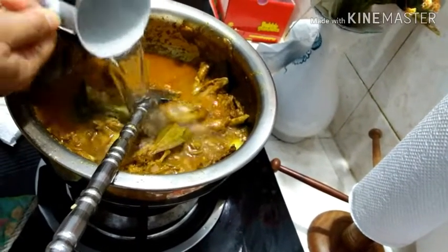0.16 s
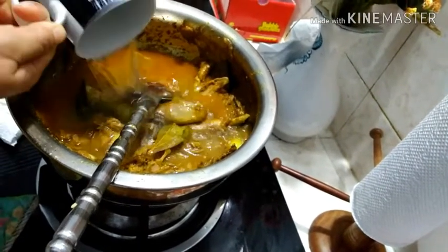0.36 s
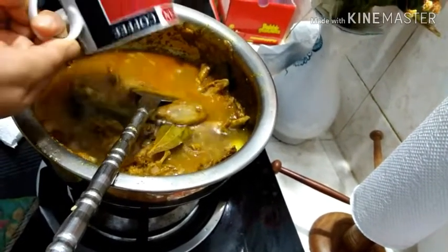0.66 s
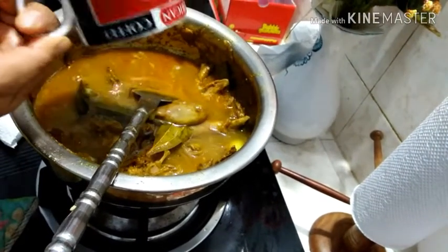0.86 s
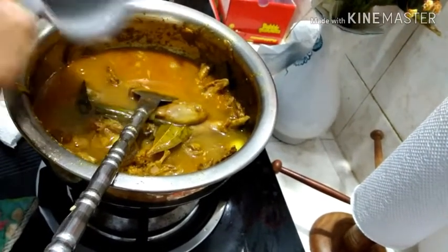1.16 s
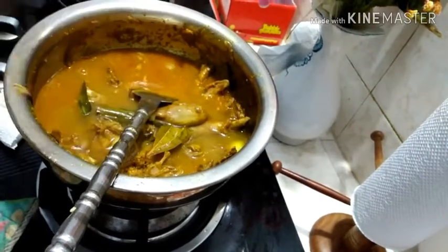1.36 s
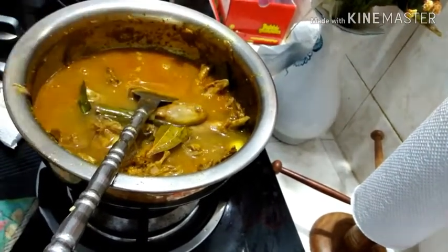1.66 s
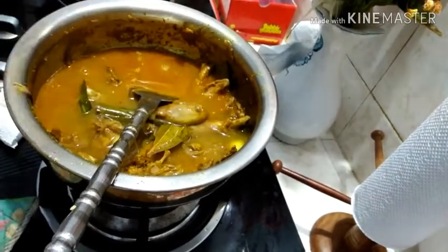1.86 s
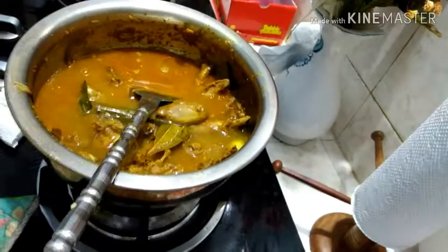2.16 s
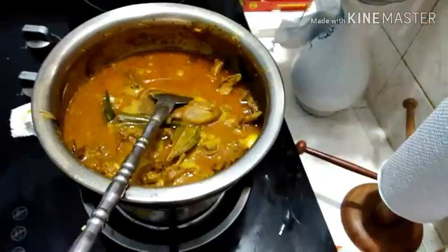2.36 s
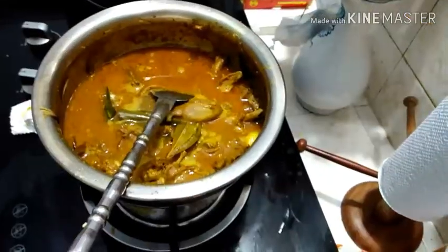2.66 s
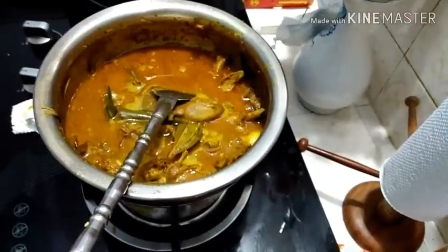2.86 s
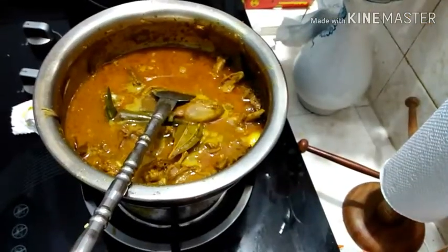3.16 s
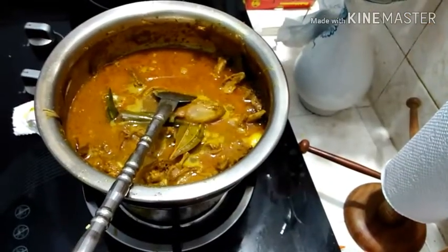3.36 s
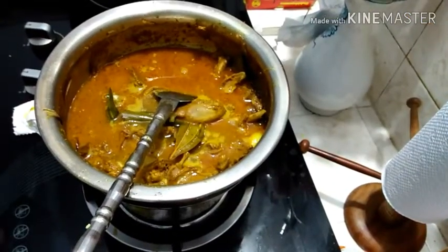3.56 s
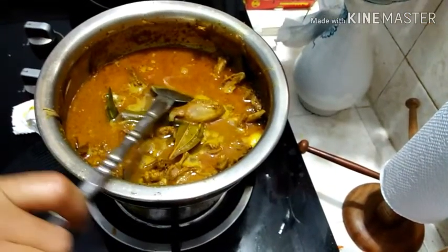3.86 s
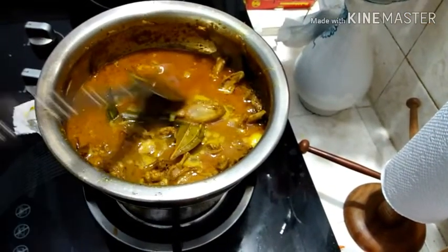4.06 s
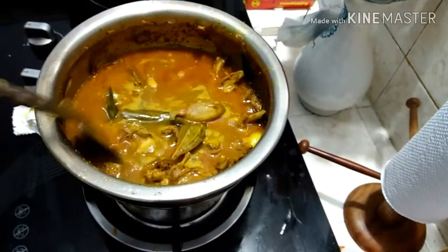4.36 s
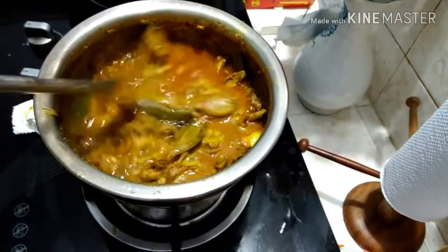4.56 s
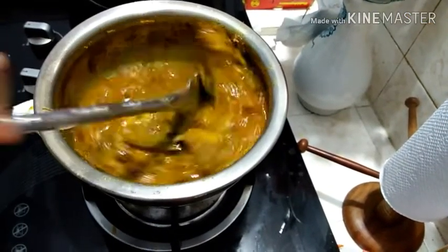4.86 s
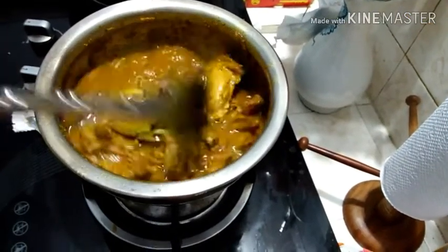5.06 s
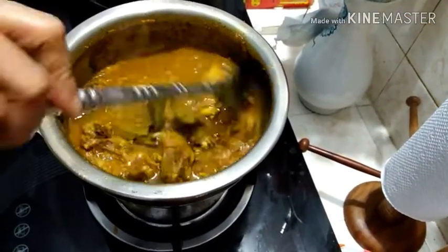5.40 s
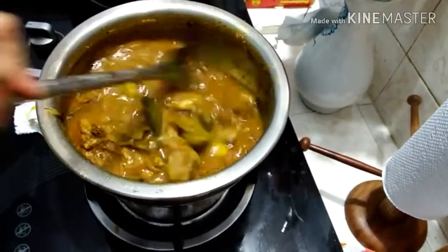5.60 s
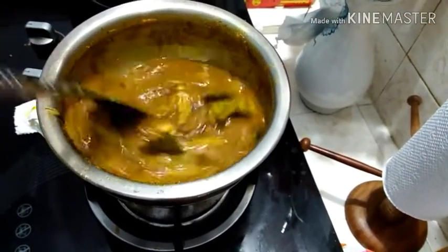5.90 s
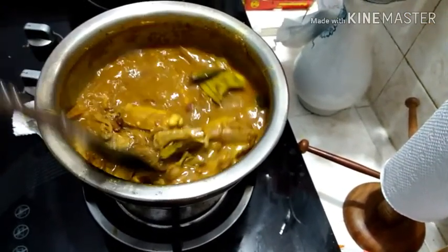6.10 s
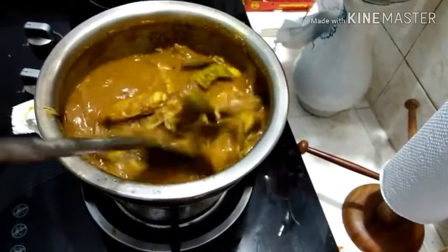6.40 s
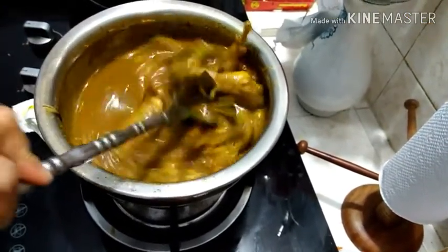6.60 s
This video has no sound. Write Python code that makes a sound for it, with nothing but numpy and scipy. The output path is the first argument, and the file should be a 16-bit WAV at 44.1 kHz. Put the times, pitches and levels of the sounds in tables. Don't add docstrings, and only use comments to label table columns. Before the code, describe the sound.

Water trickles into a hissing, spitting pot of stew, then a metal spatula stirs, clacking sharply and clanking against the ringing rim.

```python
import sys
import numpy as np
from scipy import signal
from scipy.io import wavfile
from scipy.ndimage import uniform_filter1d

SR = 44100
rng = np.random.default_rng(int(sys.argv[2]) if len(sys.argv) > 2 else 0)


def transcribe(signal):
    frames = np.atleast_2d(signal).T
    limited = np.clip(frames, -1, 1)
    pcm = np.round(limited * 32767).astype(np.int16)
    wavfile.write(sys.argv[1], SR, pcm)


def boost_factor(decibels):
    exponent = np.asarray(decibels, float) / 20
    return 10 ** exponent


N = 297234
T = np.arange(N) / SR
MOVE_S = 2.1
BRIGHT_HZ = 2800
DROP_RISE_S = 0.0018


def evened(x):
    return x / np.sqrt(np.mean(x ** 2) + 1e-20)


def read(points, hz):
    f, value = np.transpose(points)
    return np.interp(np.log(hz + 1), np.log(f + 1), value)


def curves(rows):
    s, *columns = np.transpose(rows)
    return [np.interp(T, s, column) for column in columns]


def add(mix, s, sound):
    part = mix[..., max(round(s * SR), 0):][..., :sound.shape[-1]]
    part += sound[..., :part.shape[-1]]


def bump(middle_s, width_s):
    return np.exp(-((T - middle_s) / width_s) ** 2)


def noise(shape, patchy_db, low_hz=1, high_hz=SR, size=512):
    frames, hz = 4 * N // size + 5, np.fft.rfftfreq(size, 1 / SR)
    a, b, patches = rng.standard_normal((frames, len(hz), 3)).T
    patches = uniform_filter1d(patches, size=7, axis=0)
    patches = evened(uniform_filter1d(patches, size=16, axis=1))
    band = 1 / np.sqrt((1 + (low_hz / (hz + 1)) ** 20) * (1 + (hz / high_hz) ** 20))
    colour = boost_factor(read(shape, hz)[:, None] + patchy_db * patches) * band[:, None]
    sound = signal.istft((a + 1j * b) * colour, nperseg=size, noverlap=3 * size // 4)[1]
    return evened(sound[:N])


def resonate(x, hz, width):
    turn, r = np.exp(2j * np.pi * hz * T), np.exp(-np.pi * width / SR)
    smooth = signal.lfilter([1], np.convolve([1, -r], [1, -r]), x / turn)
    return (turn * smooth).real


def struck(t, rise, t60):
    return (1 - np.exp(-t / np.maximum(rise, .0002))) * boost_factor(-60 * t / np.maximum(t60, .005))


def bursts(rows):
    out, t = np.zeros(N), T[:SR // 3]
    for s, db, low_hz, high_hz, rise, t60 in rows:
        sos = signal.butter(3, [low_hz, high_hz], "band", fs=SR, output="sos")
        band = signal.sosfilt(sos, rng.standard_normal(len(t)))
        add(out, s, boost_factor(db) * struck(t, rise, t60) * evened(band))
    return out


def pings(rows):
    bubble_t60_s, bubble_glide = 0.02, 0.12
    out, t = np.zeros(N), T[:SR // 4]
    for s, db, hz, rise, t60 in rows:
        u = t[:round(2 * t60 * SR) + SR // 100]
        is_bubble = (t60 < bubble_t60_s) * (hz < BRIGHT_HZ + 500)
        glide = bubble_glide * is_bubble * u / t60
        add(out, s, boost_factor(db) * struck(u, rise, t60) * np.sin(2 * np.pi * hz * u * (1 + glide)))
    return out


# (f/Hz, width/Hz, throb depth 0-1)
MOTOR_TONES = [(135.5, 4, 0.85), (68.6, 11, 0)]


def drones(motor_db, low_db):
    throb_s, peak_s, skew = 0.158, 1.835, 0.6
    turn = 2 * np.pi * (T - peak_s) / throb_s
    beat = np.cos(turn + skew * (np.cos(turn) - 1))
    out = np.zeros(N)
    for (hz, width, depth), db in zip(MOTOR_TONES, (motor_db, low_db)):
        tone = evened(resonate(rng.standard_normal(N), hz, width))
        sway = np.sqrt(uniform_filter1d(tone ** 2, size=1500) + 1e-9)
        steady = tone / sway ** .85
        out += boost_factor(db - 1.0) * evened(steady * (1 + depth * beat))
    return out


# (f/Hz, level/dB per Hz)
MURMUR_COLOUR = [(15, -54), (25, -25), (60, -6), (97, -3), (134, -2), (223, -31.5), (275, -11.5),
                 (363, -31.5), (404, -20.5), (532, -18.5), (617, -17), (1300, -20), (2450, -22),
                 (2850, -30.5), (3380, -40), (4000, -39.5), (5200, -32.5), (8800, -120)]
# (t/s, level/dB)
MOTOR_SWELL = [(0.0, -67), (0.36, -65), (0.71, -62), (0.98, -57), (1.73, -52), (2.36, -51), (2.55, -62),
               (2.74, -65.5), (3.1, -63), (4.07, -61), (4.49, -57.5), (4.9, -62), (5.05, -64.5),
               (5.33, -64), (5.74, -65), (6.14, -66), (6.74, -68.5)]
# (level/dB, share)
MOTOR_FOLLOWERS = [(-55, 0.18), (-64.5, 0.43), (-65.5, 0.74)]


def room_noise():
    motor_db, = curves(MOTOR_SWELL)
    murmur_db, boom_db, low_db = [db + share * (motor_db + 62.0) for db, share in MOTOR_FOLLOWERS]
    lull_db = -3.5 * bump(2.72, 0.18)
    murmur_db = murmur_db + 5 * bump(0.19, 0.12) + lull_db
    boom_db = boom_db + 7 * bump(4.82, 0.48) + lull_db
    low_db = low_db - 11 * (T < MOVE_S)
    out = boost_factor(murmur_db - 4.0) * noise(MURMUR_COLOUR, 2.6, 604, 4800, size=1024)
    out += boost_factor(boom_db - 1.84) * noise(MURMUR_COLOUR, 2.5, 157, 480, size=2048)
    out += boost_factor(-66.0) * noise(MURMUR_COLOUR, 0.31, 1, 200, size=2048)
    out += boost_factor(-79.0) * noise([(1, 0), (2, 0)], 0.99, 4000, 7700)
    return out + drones(motor_db, low_db)


# (f/Hz, t60/s)
ROOM_DECAY = [(200, 0.19), (1000, 0.5), (3000, 0.58), (8000, 0.34), (14000, 0.025)]


def kitchen(x):
    echoes = np.zeros(SR)
    at = np.arange(300, SR - 20, 20)
    echoes[at + rng.integers(0, 20, len(at))] = rng.choice([-1., 1.], len(at))
    hz, t, z = signal.stft(echoes, SR, nperseg=256)
    fade = boost_factor(-60 * t / read(ROOM_DECAY, hz)[:, None])
    tail = signal.istft(z * fade, SR, nperseg=256)[1]
    return signal.fftconvolve(x, tail / np.linalg.norm(tail))[:N]


# (t/s, level/dB, t60/s)
STAND_JOLTS = [
    (2.2, -49, 0.39),
    (2.449, -38.5, 0.077),
    (3.2, -52, 0.28),
    (4.482, -55, 0.25),
    (5.529, -45, 0.17),
    (5.839, -48, 0.19),
]


def jolts():
    return bursts([(s, db, 50, 94, .006, t60) for s, db, t60 in STAND_JOLTS])


# (t/s, level/dB, t60/s)
BOTTOM_THUDS = [
    (4.721, -46, 0.15),
    (5.089, -42.5, 0.17),
    (5.533, -44, 0.1),
    (5.771, -46, 0.15),
    (5.846, -44, 0.15),
]


def thuds():
    return bursts([(s, db, 238, 333, .003, t60) for s, db, t60 in BOTTOM_THUDS])


# (t/s, level/dB, low/Hz, high/Hz, t60/s)
POT_KNOCKS = [(2.261, -46.5, 620, 1070, 0.092), (5.53, -32, 1800, 7000, .04),
              (2.573, -45.5, 860, 3100, 0.04), (2.619, -41, 1094, 1360, 0.088),
              (3.789, -50.5, 1167, 1420, 0.39), (4.075, -54.5, 1300, 2570, 0.49),
              (4.105, -44.5, 1830, 2050, .15), (4.25, -50.5, 1400, 1560, 0.15),
              (4.34, -51, 1350, 1800, 0.085), (4.1, -52, 737, 870, 0.41),
              (4.7195, -16.5, 7900, 10500, 0.035), (4.718, -36, 400, 4500, 0.08),
              (4.727, -28, 420, 500, 0.08), (4.722, -34.5, 590, 800, 0.17), (4.728, -39, 1970, 2260, 0.26),
              (4.965, -50, 620, 860, 0.47), (5.005, -49, 1110, 1310, 0.22), (5.67, -38, 9100, 10000, 0.45),
              (4.721, -42.5, 830, 1300, 0.094), (5.072, -34, 1400, 2500, 0.017),
              (5.089, -39, 250, 1400, 0.06), (5.088, -29, 570, 773, 0.071),
              (5.414, -36.5, 850, 1600, 0.016), (5.479, -38, 270, 1440, 0.027),
              (5.529, -33.5, 600, 1550, 0.21), (5.846, -41.5, 240, 1240, 0.04),
              (5.895, -45.5, 610, 940, 0.19), (6.028, -42, 1500, 2300, 0.013),
              (6.106, -31, 1160, 1800, .014), (6.426, -41.5, 1950, 2350, 0.13),
              (6.42, -44, 4400, 6600, 0.05), (6.43, -38, 8900, 9300, 0.13), (.121, -41.5, 630, 2900, 0.038),
              (0.29, -56, 2250, 2500, 0.48), (5.095, -45, 680, 830, 0.22), (5.535, -43.5, 660, 950, 0.21)]


def knocks():
    fill_turns, fill_max_s = 2.54, 0.016
    return bursts([(s, db, low, high, min(fill_turns / (high - low), fill_max_s), t60)
                   for s, db, low, high, t60 in POT_KNOCKS])


# (f/Hz, level/dB, t60/s)
BLADE_TONES = [(1576, -26.5, 0.09), (2044, 1.5, 0.023), (2240, -18, 0.051), (2650, -33, 0.024),
               (2930, -28, 0.15)]
# (t/s, level/dB, pitch bend/ratio, bright tones/dB, softness/time ratio)
BLADE_TAPS = [
    (4.112, -33, 1.003, -27, 3.3),
    (4.7183, -8, 1.017, -8, 1.3),
    (6.4203, -19.5, 1.025, 0, 0.88),
]


def taps():
    rise_s = 0.0024
    rows = []
    for s, db, bend, bright_db, soft in BLADE_TAPS:
        for hz, tone_db, t60 in BLADE_TONES:
            level_db = db + tone_db + bright_db * (hz > BRIGHT_HZ)
            rows.append((s, level_db, hz * bend, rise_s * soft, t60 * soft))
    return pings(rows)


# (f/Hz, level/dB, t60/s)
EDGE_TONES = [(4620, -20, .03), (6270, -14, .08), (7660, -8, .05), (7946, -5, .09), (8468, -4, .05),
              (8710, 0, .05), (9125, -6, .14), (10070, -2, .04), (11500, -12, .08), (12700, -12, .035),
              (14100, -15, .04)]
# (t/s, level/dB, ring time/ratio)
EDGE_CLIPS = [
    (4.7178, -7, .07),
    (4.7179, -13, .25),
    (4.7515, -29, .12),
    (4.748, -29, .4),
    (4.879, -32, .3),
    (5.5356, -17, .3),
    (6.4022, -31, .15),
    (6.4203, -29, 1),
    (6.4325, -31, .7),
]


def clips():
    return pings([(s, db + tone_db, hz, 0.00022, t60 * ring)
                  for s, db, ring in EDGE_CLIPS for hz, tone_db, t60 in EDGE_TONES])


CLANK_LEVELS = (-16, -10, -14, -29)
# (f/Hz, width/Hz, level/dB)
RIM_TONES = [(6090, 38, -9), (6350, 39, -8), (6550, 26, -11), (6800, 44, -11), (7100, 83, -8),
             (7450, 74, -13), (7940, 31, -6), (8310, 49, -12), (8720, 15, -13), (8940, 45, -2),
             (9130, 30, -6), (9530, 31, -2), (10200, 32, -12), (10300, 38, -13), (10600, 79, -9),
             (11000, 45, -12), (11400, 36, -13), (12000, 75, -10), (12200, 43, -13), (12700, 70, -9),
             (13300, 50, -11), (14000, 44, -20)]
# (f/Hz, level/dB)
RIM_LIFT = [(6000, 7), (9000, 6.5), (13000, 13)]
# (f/Hz, t60/s)
RIM_FADE = [(2000, 0.43), (3000, 0.36), (3600, 0.33), (5000, 0.29), (7000, 0.17), (10000, 0.12),
            (13000, 0.046)]
# (f/Hz, rise/s)
RING_RISE = [(2000, 0.0098), (3500, 0.0088), (5000, 0.016), (6500, 0.039), (9500, 0.00022)]
# (f/Hz, level/dB)
WALL_TONES = [(1963, -21), (1996, -17), (2038, -13), (2071, -13), (2104, -14), (2184, -16), (2226, -11),
              (2444, -20), (2514, -20), (2999, -3), (3022, -9), (3070, -20), (3129, -11), (3159, -10),
              (3206, -14), (3519, -12), (3538, -4), (3562, 1), (3584, -11), (3609, -14), (3665, -20),
              (3814, -16), (3942, -20), (4057, -19), (4186, -15), (4215, -17), (4484, -26), (4744, -20),
              (4786, -15), (4855, -16), (4880, -11), (4908, -6), (4950, -15), (5620, -17), (5824, -12),
              (7860, -9), (9670, -4)]
# (f/Hz, t60/s)
WALL_FADE = [(2060, 0.37), (2230, 0.38), (3000, 0.36), (3150, .3), (3560, 0.29), (4190, 0.32), (4910, 0.39),
             (5800, 0.31), (9600, 0.13)]
# (f/Hz, level/dB per Hz)
SHIMMER_COLOUR = [(180, -74), (300, -63), (841, -18), (1820, -26), (2170, 8), (2780, -1.5), (3490, 5.5),
                  (4600, -7.5), (5500, -13), (6400, -9.5), (9180, -8), (13200, -15.5), (15000, -33)]


def clank():
    clank_s, wall_db = 5.5355, -17
    out, t = np.zeros(N), T[:SR]
    ring_db, crack_db, bright_db, dull_db = CLANK_LEVELS
    hz, width, db = np.transpose(RIM_TONES)[:, :, None]
    phase, other, offset = rng.random((len(RIM_TONES), 3, 1)).transpose(1, 0, 2)
    neighbour_hz = hz + width * (-.55 - 0.58 * offset)
    pair = np.sin(2 * np.pi * (hz * t + phase))
    pair += 0.72 * np.sin(2 * np.pi * (neighbour_hz * t + other))
    envelope = struck(t, read(RING_RISE, hz), read(RIM_FADE, hz))
    ring = boost_factor(ring_db + db + read(RIM_LIFT, hz)) * envelope * pair

    hz, db = np.transpose(WALL_TONES)[:, :, None]
    envelope = struck(t, read(RING_RISE, hz), read(WALL_FADE, hz))
    wall = boost_factor(wall_db + db) * envelope * np.sin(2 * np.pi * (hz * t + rng.random(hz.shape)))

    bright = noise(SHIMMER_COLOUR, 2.5, 5960)[:SR]
    dull = noise(SHIMMER_COLOUR, 2.3, 1, 5900)[:SR]
    bright *= boost_factor(crack_db) * struck(t, 0.00034, 0.011) + boost_factor(bright_db) * struck(t, 0.0094, 0.43)
    dull *= boost_factor(dull_db) * struck(t, 0.0018, 0.55)
    add(out, clank_s, ring.sum(0) + wall.sum(0) + bright + dull)
    return out


def trickle(count=300):
    end_s, t60_s, level_db, spread_db = 0.99, 0.014, -46.5, 3
    big_hz, small_hz, sag, spread = 920, 2950, 0.21, 0.16
    when, size, loud, off = rng.random((count, 4)).T
    s = end_s * when ** 1.8
    hz = np.where(size < .35, big_hz, small_hz)
    hz = hz * (1 - sag * np.sqrt(s)) * (1 + spread * (2 * off - 1))
    db = level_db - spread_db * np.log(loud) - 6 * s
    return pings([(a, b, c, DROP_RISE_S, t60_s) for a, b, c in zip(s, db, hz)])


# (t/s, level/dB, f/Hz, t60/s)
BUBBLES = [(0.017, -46, 3030, 0.017), (.030, -30, 2860, 0.013), (.033, -49, 775, 0.024),
           (.069, -34, 2980, 0.03), (.092, -39, 3000, 0.03), (.122, -32, 2040, 0.073),
           (.122, -35, 900, 0.048), (0.124, -36, 1240, 0.026), (.163, -37, 3170, 0.036),
           (0.167, -38, 2480, 0.036), (0.184, -29, 2950, 0.016), (0.225, -41, 920, .03),
           (.279, -22, 2400, 0.014), (.287, -20, 2540, 0.01), (.311, -38, 2300, .025),
           (.374, -42, 2350, .02), (.21, -44, 900, .04), (.112, -36, 2400, .012), (.495, -47, 3400, .08),
           (0.293, -38, 2346, 0.05), (.343, -38, 2520, 0.027), (.359, -45, 2370, 0.051),
           (.411, -41, 4780, .015), (.425, -42, 2390, 0.028), (.345, -41, 776, 0.028),
           (.498, -43, 2540, 0.047), (.522, -36, 2490, 0.022), (.546, -42, 2530, 0.027),
           (4.118, -39.5, 2510, 0.044), (5.09, -37, 1376, 0.07), (5.092, -44, 1130, .06),
           (5.1, -40.5, 2280, 0.065), (.455, -44, 136, 0.15), (4.748, -32, 3440, 0.045),
           (4.724, -17, 9050, .03), (4.7178, -17, 13400, .012), (4.747, -24, 9000, .03),
           (5.092, -40, 436, .08), (6.4015, -30, 8100, .015), (5.845, -35, 694, .06),
           (5.852, -40, 430, .04), (.261, -36, 2400, 0.016), (.591, -42, 2460, .025),
           (.712, -45, 2540, .025), (.292, -36, 3100, .015), (4.831, -13, 8430, 0.011),
           (5.527, -27.5, 107, 0.024), (5.528, -27.5, 238, 0.028), (5.76, -31, 2240, 0.041),
           (6.108, -34, 1310, 0.019)]


def drops():
    return pings([(s, db, hz, DROP_RISE_S, t60) for s, db, hz, t60 in BUBBLES])


# (t/s, level/dB, t60/s)
SHARP_SPITS = [(.004, -51, .02), (.061, -36, .014), (.070, -28, .016), (.077, -29, .011),
               (0.163, -23.5, 0.015), (.171, -44, .01), (0.183, -26, .011), (.235, -37, .041),
               (0.493, -26, 0.016), (0.815, -34, 0.02), (1.523, -38, 0.02), (1.851, -33, .03),
               (2.443, -34, 0.02), (2.451, -36, .02), (2.572, -21, .012), (3.365, -31, .015),
               (3.373, -31.5, 0.047), (4.718, -15, 0.01), (4.7205, -24, .04), (4.725, -32.5, 1),
               (5.474, -41, 0.088), (5.5284, -11, 0.02), (5.532, -18, .02), (6.188, -34, 0.03),
               (6.402, -35, 0.008), (6.4203, -31, .02), (6.634, -40, 0.02), (6.199, -30, .01)]


def spits():
    return bursts([(s, db, 7580, 13500, .0003 + 0.025 * t60, t60) for s, db, t60 in SHARP_SPITS])


# (t/s, level/dB, brightness/dB, hold/s)
STEAM_SPURTS = [(0.332, -29.5, -9, 0.048), (0.49, -22.5, 2.5, 0.016), (1.518, -35.5, -2, 0.027),
                (1.555, -32.5, -2.5, 0.065), (1.607, -27, -13, 0.12), (1.654, -28, -18, 0.033),
                (1.751, -21.5, -2, 0.013), (1.847, -25.5, 4, 0.021), (2.44, -26, -10, 0.014),
                (2.56, -18, 0, 0.018), (2.988, -35, -5.5, 0.19), (3.078, -35, -8, 0.1),
                (3.363, -25, -15, 0.015), (3.536, -29.5, 1.5, 0.019), (3.595, -23, -12, 0.025),
                (3.736, -20, -1, 0.03), (3.706, -33, -3, .012), (4.645, -40, -2, .03),
                (4.219, -35, -9, 0.012), (5.293, -36.5, -1, 0.015), (5.373, -37, -6, 0.17),
                (5.855, -29.5, -5, 0.022), (5.901, -25.5, 1.5, 0.006), (5.98, -26, -5, 0.12),
                (6.145, -33, -3, 0.022), (6.183, -26, 3, 0.07)]
# (t/s, level/dB, rise/s)
STEAM_SURGES = [
    (0.579, -25.5, 0.019),
    (2.602, -22.5, 0.016),
    (3.779, -21, .016),
    (4.997, -19.5, 0.032),
    (6.232, -23.5, 0.016),
]
# (t/s, level/dB, brightness/dB, rise/s, hold/s)
STEAM_SWELLS = [
    (.22, -34, -1, .05, .15),
    (4.95, -30, -4, .02, .05),
    (6.44, -36, -3, .01, .06),
    (0.943, -38, -2, 0.043, .12),
    (2.175, -35.5, -6, .035, .14),
    (2.83, -33.5, -2, 0.056, 0.12),
    (4.08, -32, -4.5, 0.04, 0.15),
    (4.3, -35, -3, 0.073, 0.24),
]


def steam_jets():
    def body_db(s):
        return -16.5 if s > MOVE_S else -9

    jets = [(s, db, top, body_db(s), 0.0079 * boost_factor(0.27 * (db + 41.0)), hold)
            for s, db, top, hold in STEAM_SPURTS]
    jets += [(s, db, 4, -8.5, rise, 0.049) for s, db, rise in STEAM_SURGES]
    jets += [(s, db, top, body_db(s), rise, hold) for s, db, top, rise, hold in STEAM_SWELLS]
    return jets


def bubble_grain():
    sizes = boost_factor(3.2 * np.minimum(rng.exponential(1, N), 2.8)) * (rng.random(N) < 300 / SR)
    return evened(1 + 0.11 * signal.oaconvolve(sizes, np.exp(-T[:400] / 0.0023))[:N])


# (t/s, level/dB, spray brightness/dB)
BOIL = [(0.0, -45, -0.5), (0.47, -50.5, -1), (0.73, -56.5, 0), (1.24, -54, -14), (1.54, -56.5, -2),
        (1.76, -46, -5), (1.97, -71.5, -4), (2.36, -51, -10), (2.57, -45, -5), (2.76, -57.5, -20),
        (3.42, -51.5, 0), (3.65, -43, -3.5), (3.9, -55.5, -8), (4.68, -54.5, -8), (4.92, -44, -14),
        (5.14, -59, -16), (5.74, -47.5, -5), (6.74, -52.5, -6)]
# (f/Hz, level/dB per Hz)
HISS_COLOUR = [(1290, -47), (2200, -10), (2710, -17), (2910, -17.5), (3390, -10), (4220, -23.5),
               (4790, -12), (5680, -6.5), (6450, -3.5), (8350, -1.5), (10000, -3), (10900, 2), (14300, -8),
               (14600, -58), (15000, -49)]
# (f/Hz, width/Hz, level/dB)
POT_HOLLOWS = [(3397, 400, -22), (4830, 300, -15), (5750, 400, -14)]


def simmer():
    boil_db, spray_db = curves(BOIL)
    body_db = np.full(N, -14)
    power = boost_factor(2 * (boil_db + np.array([0 * T, spray_db, body_db])))
    t = T[:SR // 2]
    for s, db, top, body, rise, hold in steam_jets():
        swell = 1 - np.exp(-(t / max(rise, .0005)) ** 2)
        jet = np.exp(-(t / max(hold, .002)) ** 2)
        echo = boost_factor(1.5 - 2 * 60 * t / 0.45)
        band_db = np.array([[db], [db + top], [db + body]])
        add(power, s, boost_factor(2 * (band_db - 15.5)) * swell * (jet + echo))
    core = noise(HISS_COLOUR, 1.2, 8030, 8980)
    spray = noise(HISS_COLOUR, 0.5, 8640)
    pot = noise(HISS_COLOUR, 3.3, 1, 6160)
    pot = pot + sum(boost_factor(db) * evened(resonate(pot, hz, width)) for hz, width, db in POT_HOLLOWS)
    return (np.sqrt(power) * [core, spray, pot]).sum(0) * bubble_grain()


def scene():
    metal = clank()
    tones = drops() + trickle() + taps() + clips()
    puffs = spits() + knocks() + thuds() + jolts()
    wet = kitchen(boost_factor(-16.0) * metal + boost_factor(-19) * tones + boost_factor(-3.0) * puffs)
    return (metal + tones + puffs + wet + simmer() + room_noise())[None]


def band_limit(x):
    return signal.sosfilt(signal.butter(12, 15350, fs=SR, output="sos"), x)


def record(dry):
    limited = 0.98 * np.tanh(dry / 0.9)
    low_pass = signal.firwin(401, 14250, window=("kaiser", 7), fs=SR)
    mix = signal.oaconvolve(limited, low_pass[None], "same")
    return band_limit(mix)


dry = scene()
out = record(dry)
transcribe(out)
```